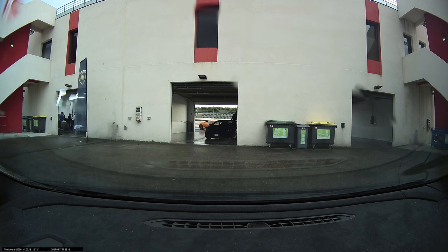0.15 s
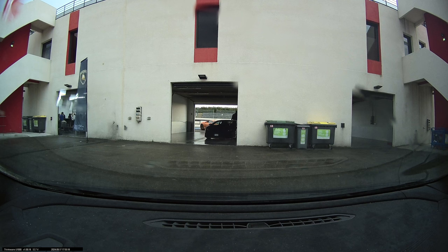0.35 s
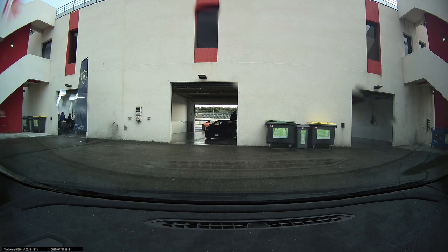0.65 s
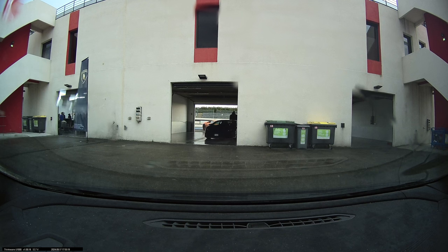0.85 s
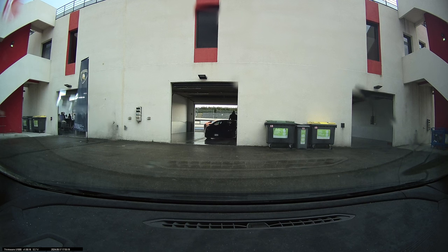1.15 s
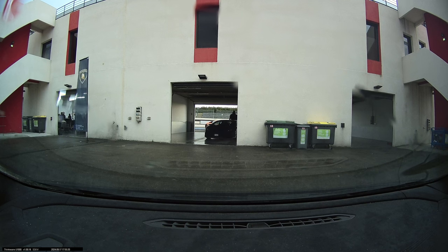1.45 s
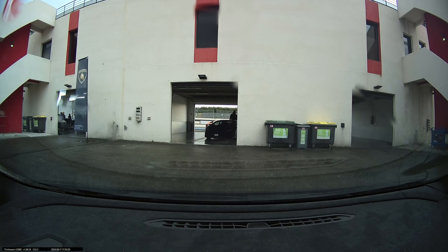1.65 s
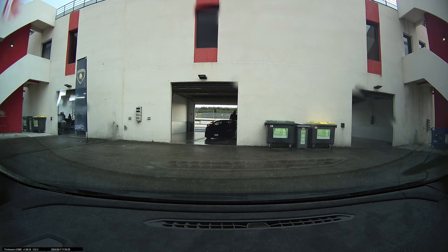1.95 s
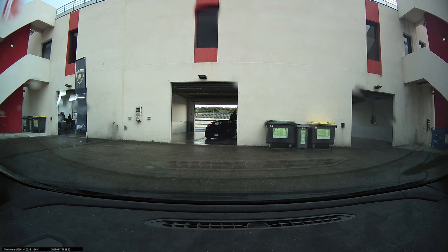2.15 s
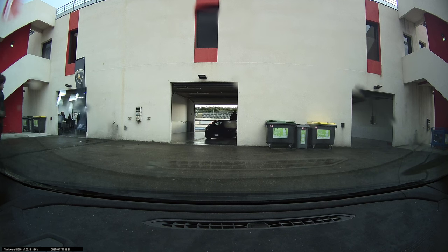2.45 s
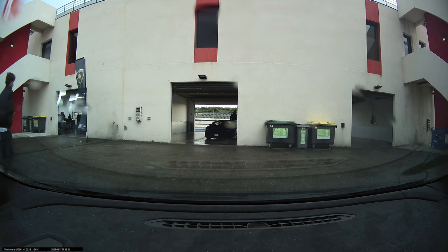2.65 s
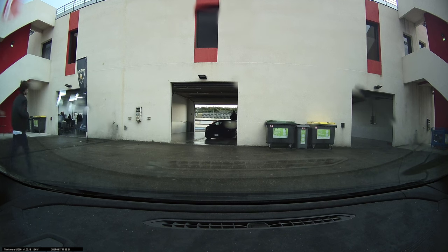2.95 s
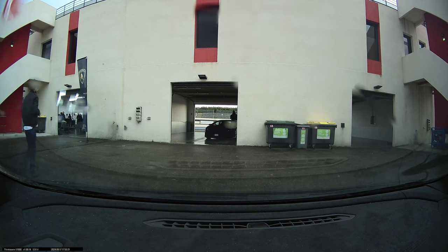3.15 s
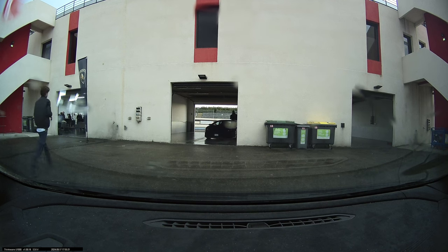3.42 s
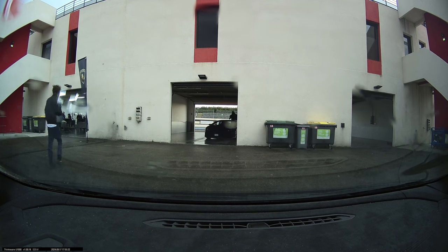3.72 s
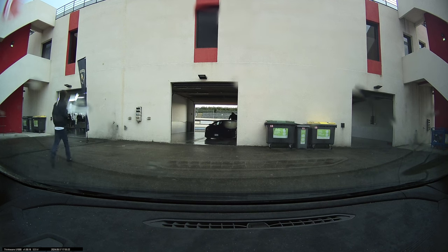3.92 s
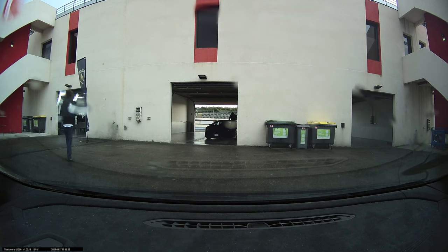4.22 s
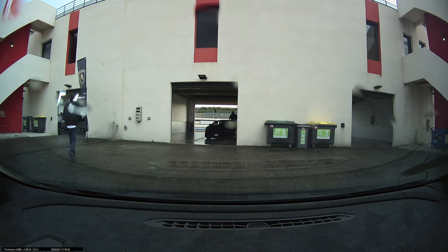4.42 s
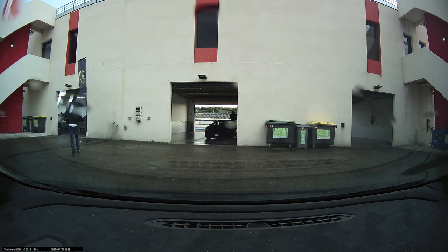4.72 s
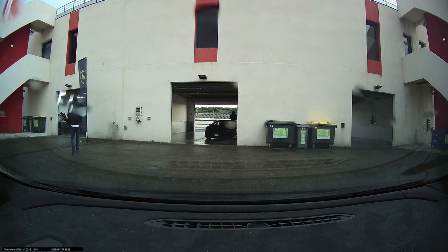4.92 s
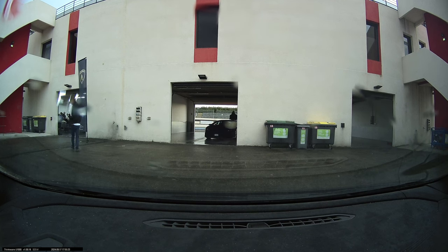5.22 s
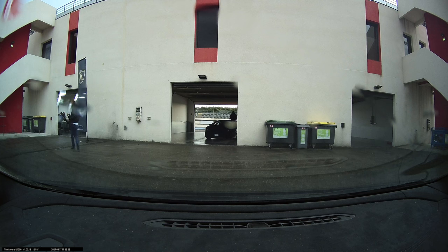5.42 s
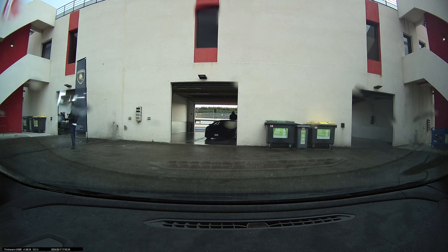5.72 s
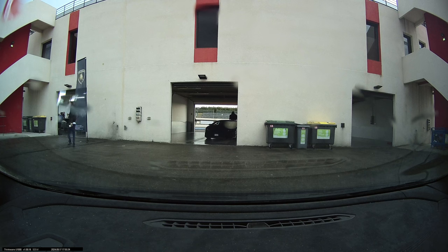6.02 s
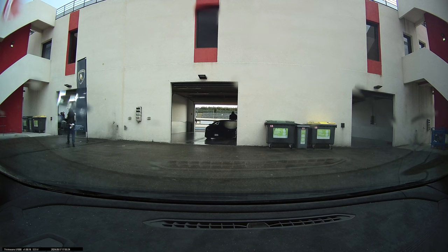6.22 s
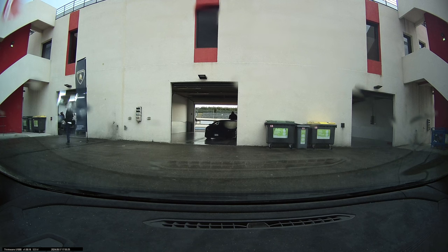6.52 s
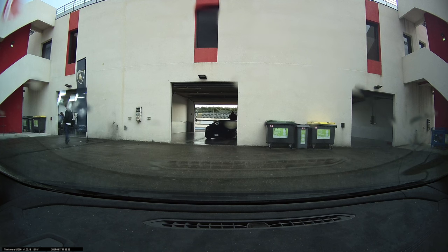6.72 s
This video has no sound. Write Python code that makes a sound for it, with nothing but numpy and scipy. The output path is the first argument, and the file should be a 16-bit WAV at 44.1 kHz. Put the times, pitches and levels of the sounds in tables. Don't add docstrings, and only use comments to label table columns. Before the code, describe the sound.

Close inside a parked car, a dash microphone picks up muffled low hiss, a faint wavering distant hum, and irregular raindrops, dull on the roof and sharp on the glass. From the start to about 0.9 seconds the car is handled: soft rocking, low bumps near 0.65 and rustling trim. At about 0.95 a thin high hinge squeal slides down and up, gone in a tenth of a second. Air pressure swells and at 1.2 the door slams, a massive distorted thump with a metallic latch crack and seal rattle. The cabin booms deeply and settles with bumps until about 2.1. Quiet rain ticks continue, with a sharper tap at 2.9 and the hum faintly back after 3. Lock motors thud at 3.64, then click at 3.85 and 4.03. Drops continue, one cracking at 5.4. A softer second locking thuds at 5.93, clicking at 6.05 and 6.23. Only sparse rain and hiss remain until 7.

```python
import sys
import numpy as np
from scipy import signal
from scipy.fft import rfft, irfft, next_fast_len
from scipy.io import wavfile
from scipy.ndimage import uniform_filter1d, map_coordinates

SR = 44100
rng = np.random.default_rng(int(sys.argv[2]) if len(sys.argv) > 2 else 0)


def generate_wav(sig):
    pcm = np.round(np.clip(np.atleast_2d(sig).T, -1, 1) * 32767).astype(np.int16)
    wavfile.write(sys.argv[1], SR, pcm)


def invert_db(x):
    u = np.asarray(x, float) / 20
    return 10 ** u


N = 302885

# frequency in Hz, level in dB per Hz.
FLOOR_COLOUR = [(8.8, -26.5), (15, 1.5), (43, 3), (108, -4), (206, -3.5), (260, -9), (379, -11.5),
                (934, -15.5), (1110, -23), (1440, -23.5), (2370, -31), (3560, -31), (5350, -37),
                (14500, -39), (15200, -35)]
# time in seconds, pitch in Hz, level in dB.
WHINE = [(0, 8630, -91.5), (1.5, 8600, -93), (2.5, 8400, -92.5), (3.6, 8390, -93.5), (3.9, 8360, -108),
         (7, 8348, -110)]
# multiple of its pitch, level in dB.
WHINE_TONES = [(1, -1.5), (1.29, -6), (1.62, -4.5)]
# time in seconds, pitch in Hz, level in dB.
HUM = [
    [(0, 208.4, -59.5), (.15, 209.2, -61.5), (.37, 210.1, -53.5), (.58, 207.4, -63), (.8, 210.3, -60),
     (1.0, 212.2, -67.5), (1.1, 212, -73)],
    [(3.05, 228.8, -73), (3.25, 231.8, -68.5), (3.45, 230.5, -71.5), (3.62, 237.2, -73.5)],
]

# start in seconds, hold in seconds, then rocking, panel and rustle in dB.
JOLTS = [(0, 0.53, -53.5, -63, -62), (0.631, 0.036, -50, -48, -52.5), (0.7, 0.061, -53, -55.5, -63),
         (0.821, 0.096, -47, -61.5, -65), (0.944, 0.085, -50, -71, -62), (1.413, 0.011, -50, -63, -53),
         (1.486, 0.016, -48, -49.5, -53.5), (1.521, 0.092, -52, -47.5, -55.5), (1.599, 0.21, -67, -58, -50),
         (1.804, 0.029, -44, -54.5, -54.5), (1.925, 0.0178, -52, -59.5, -61.5),
         (2.005, 0.121, -63, -71, -71.5), (3.948, 0.087, -64, -46, -57.5),
         (4.034, 0.03, -59.5, -40.5, -54.5), (4.085, 0.017, -71, -45, -77)]
JOLT_RISE_S, ROCK_T60_S, PANEL_T60_S, RUSTLE_T60_S = 0.017, 0.26, 0.22, 0.17
# start in seconds, level in dB, rise in seconds, t60 in seconds.
SWAY = (1.2, -45.5, 0.9, 0.33)
# start in seconds, level in dB, rise in
# seconds, t60 in seconds.
DRUMMING = [(.625, -52, 0.0343, 0.24), (0.689, -51, 0.0077, 0.12), (1.139, -36.5, 0.032, 0.33),
            (1.254, -29.5, 0.0027, 0.19), (1.419, -37.5, 0.0034, 0.16), (1.532, -47, 0.0052, 0.13),
            (1.585, -57, 0.004, 0.1), (1.672, -47.5, 0.012, 0.14), (1.814, -56, 0.0071, 0.12),
            (3.644, -41, 0.0066, 0.28), (3.958, -48.5, 0.004, 0.213), (4.001, -49, 0.0153, 0.15),
            (4.061, -35.5, 0.0026, 0.142), (5.931, -57.5, 0.0038, 0.38), (6.178, -62.5, 0.0034, 0.087)]
# frequency in Hz, level in dB per Hz.
SKIN_COLOUR = [(50, -36.5), (90, -1.5), (160, 0), (260, 1), (400, -6.5), (600, -9), (900, -10.5),
               (1600, -66)]
PANEL_COLOUR = [(32, -43), (55, -3.5), (81, 3.5), (145, -1), (215, -1), (400, -17), (520, -35), (880, -120)]
TRIM_COLOUR = [(250, -48), (420, 2), (560, -5), (800, -1), (1100, -4.5), (1350, -6.5), (1600, -7),
               (2100, -13), (2700, -21.5), (3400, -19), (4200, -26.5), (9000, -42)]
# resonance in Hz, width in Hz, level in dB.
CREAK = [(266, 40, 1), (563, 60, -2.5), (797, 38, 1.5), (1383, 42, 1.5), (2113, 85, -7), (3470, 500, -8)]
# time in seconds, swing rate in Hz, peak level in dB.
ROCKING = [(.627, 37, -41), (.675, 36.5, -33.5), (.705, 30, -31.5), (.74, 32.5, -31), (.77, 30, -39.5),
           (.85, 28.5, -42), (.88, 33, -43), (.93, 33, -41), (.96, 33, -58)]
# start in seconds, pitch in Hz, level in dB, t60 in seconds.
KNOCKS = [(.645, 318.5, -44.5, 0.132), (1.2455, 880, -28.5, 0.015), (1.2565, 600, -24, 0.0282),
          (1.257, 1580, -31.5, 0.023), (1.259, 3500, -35, .03), (1.246, 3280, -39, .015),
          (1.284, 770, -42, 0.062), (1.3, 254, -38.5, 0.2), (1.362, 226.8, -41.5, 0.116),
          (1.331, 130, -30, 0.24), (1.34, 193, -35.5, 0.193), (1.42, 258, -42, 0.155),
          (1.532, 143, -41.5, 0.12), (1.536, 266, -41.5, 0.11), (1.585, 45, -27, 0.085),
          (1.812, 126, -40.5, 0.2), (3.64, 285.6, -30.5, 0.14), (3.961, 149, -45, 0.44),
          (4.06, 135.8, -40, 0.23), (1.535, 194, -39.5, 0.15), (1.83, 75.2, -41, 0.207),
          (3.645, 377, -30.5, 0.11), (3.641, 227.8, -38, 0.28)]

# start in seconds, peak level in dB, splash fade in dB per 10 ms.
ROOF_DROPS = [(0.355, -39, 3.5), (1.379, -43, 14), (1.393, -50, 3), (1.42, -44, 17), (1.436, -39.5, 11.5),
              (1.483, -42.5, 11), (1.534, -43.5, 6), (1.669, -40.5, 2), (2.043, -42.5, 18),
              (2.323, -46, 18), (2.845, -53, 3.5), (2.982, -51, 2), (3.073, -41.5, 12.5),
              (3.096, -54.5, 2.5), (3.256, -47, 5.5), (3.357, -44.5, 13), (3.959, -60, 11.5),
              (4.069, -45, 6), (4.26, -48.5, 9), (4.424, -45, 7.5), (4.588, -54, 2), (5.13, -43, 15.5),
              (5.302, -51, 4.5), (5.365, -50.5, 2), (5.549, -51, 2.5), (5.785, -55, 10.5), (5.85, -47, 18),
              (6.132, -50.5, 3.5), (6.38, -50, 7), (4.505, -47.5, 12.5)]
GLASS_DROPS = [(0.455, -55, 6.7), (.627, -45, 14), (.741, -40.5, 21.6), (0.811, -48, 9.5),
               (0.873, -49, 4.1), (1.079, -51.5, 7.1), (1.589, -45, 6), (2.016, -42.5, 6.5),
               (2.156, -50.5, 4.2), (2.181, -50, 7), (2.544, -48, 16), (0.4672, -47, 11), (3.052, -52, 5.4),
               (3.304, -47, 28), (3.326, -43.5, 24.6), (3.743, -53, 2.3), (3.777, -51.5, 3.7),
               (3.907, -46, 3.5), (3.989, -43, 15), (4.121, -47.5, 20), (4.15, -38.5, 23),
               (4.795, -46.5, 10), (4.899, -47, 8.14), (5.154, -47, 12), (5.183, -47, 15),
               (0.611, -43.5, 7.4), (5.623, -46, 6.6), (5.64, -43, 23), (5.692, -51, 13),
               (6.842, -49.5, 6.7)]
ROOF_SHARP_DB, GLASS_SHARP_DB = -16, -8
STRAY_PER_S, STRAY_DB, STRAY_FADE_DB = 4.5, -66, 9
# frequency in Hz, level in dB per Hz.
CABIN_COLOUR = [(180, -42.5), (300, -11.5), (410, 0), (750, 0.5), (1100, -3), (1400, -4), (1850, -8),
                (2600, -14), (3400, -21), (4000, -21.5), (4600, -36), (9000, -56.5), (15000, -72.5)]
# start in seconds, level in dB, pitch in Hz, t60 in seconds.
SNAPS = [(0.0173, -52.5, 3290, 0.0056), (.155, -56, 3600, 0.0079), (0.177, -59, 3500, .008),
         (.2438, -56, 2400, .008), (.3057, -62.5, 3000, 0.0076), (.3361, -57, 3600, 0.0078),
         (.5935, -56, 3187, .006), (0.6541, -49, 2780, 0.011), (1.5114, -57, 1800, .008),
         (1.6171, -57, 2000, 0.007), (1.6366, -55, 1500, 0.0073), (1.7533, -56, 1500, 0.0073),
         (1.7882, -48, 1390, 0.0094), (1.839, -48, 1390, 0.0092), (2.8672, -34.5, 947, 0.0064),
         (3.304, -53, 1490, 0.0044), (4.15, -51, 1290, 0.0069), (5.156, -48, 1490, 0.0059),
         (5.442, -32, 1090, 0.0045), (5.4173, -56, 1900, .006), (6.095, -60, 1490, .006),
         (6.117, -60, 3600, .006), (5.848, -53, 1198, 0.0092)]
SNAP_SPLASH_DB, SNAP_SPLASH_T60_S = -21, 0.044
# multiple of its pitch, level in dB.
SNAP_OVERTONES = [(2.3, -8), (4.2, -10), (6.2, -15)]
SNAP_EDGE_T60_S = 0.0035
# start in seconds, level in dB, pitch in Hz.
TICKS = [(0.5566, -65, 1670), (0.9103, -63, 3740), (0.9302, -56, 2540), (1.8855, -57.5, 1500),
         (1.9315, -65, 2000), (1.9395, -64, 2060), (2.08, -66, 1580), (2.255, -57, 1520),
         (2.3037, -57, 1730), (2.372, -64, 1590), (2.4124, -63, 1850), (2.4603, -58, 1680),
         (2.5126, -59, 1510), (2.5616, -64, 1620), (2.6094, -73.5, 1570), (2.648, -61.5, 1520),
         (2.7197, -66, 1870), (2.8075, -64, 3370), (2.8195, -62, 1980), (2.9105, -58, 1510),
         (2.9414, -69, 1750), (2.9584, -59.5, 2130), (3.011, -58, 1780), (3.1522, -63, 1710),
         (3.1694, -73, 1550), (3.2251, -68, 1510), (3.263, -59, 1670), (3.4236, -65, 1790),
         (3.48, -62, 1660), (3.6012, -59, 1590), (4.2223, -67, 1500), (4.348, -72, 1650),
         (4.366, -59, 1690), (4.4079, -60, 1730), (4.6024, -56, 1890), (4.6287, -66, 2120),
         (4.675, -57.5, 1660), (4.8268, -59, 1670), (4.8806, -60, 1750), (5.236, -60.5, 3640),
         (5.2709, -68, 1560), (5.476, -62, 1770), (5.4983, -65, 1620), (5.7683, -66.5, 2110),
         (5.8047, -63, 1580), (5.9908, -63, 1500), (6.4423, -63, 1610), (6.4961, -72, 1680),
         (6.5635, -63, 1580), (6.622, -62.5, 1690), (6.7865, -71, 3720)]
TICK_T60_S, TICK_GAIN_DB, PANE_TOP_HZ = 0.0084, 1.5, 7060

# time in seconds, pitch in Hz, level in dB.
SQUEALS = [
    [(.872, 14200, -87), (.895, 12000, -80), (.908, 9300, -80), (.912, 8059, -70), (.943, 7540, -63.5),
     (.958, 7500, -69), (.965, 6620, -61), (.974, 5880, -70), (.98, 5800, -95.5)],
    [(.962, 7705, -86), (.97, 7670, -56.5), (.989, 8010, -63.5), (1.0, 8970, -63), (1.012, 9900, -67),
     (1.023, 10940, -67), (1.036, 11200, -73.5), (1.048, 11400, -89)],
]
# frequency in Hz, level in dB per Hz.
HINGE_COLOUR = [(1470, -43), (2500, -6), (3500, 1), (4200, -7.5), (5100, -3.5), (7000, -8), (8800, -4),
                (10700, -3.5), (12000, -7), (15500, -12.5)]
# time in seconds, pitch in Hz, level in dB.
JUDDER = [(.935, 3540, -86.5), (.952, 3560, -62), (.965, 3500, -60), (.978, 3500, -61.5), (1.0, 3300, -80)]
# multiple of its pitch, level in dB.
JUDDER_TONES = [(1, -3), (3, -4)]
# start in seconds, length in seconds, first pitch in Hz, last pitch in Hz, level in dB.
WHISTLES = [(.915, .045, 15700, 15400, -76), (.922, 0.05, 5000, 5100, -71), (.924, 0.031, 2600, 2550, -70),
            (.95, .018, 14200, 13800, -76), (.962, .022, 13300, 13100, -74), (.98, .025, 7800, 7900, -68),
            (.98, 0.049, 11000, 11300, -69), (1.016, .026, 12900, 13500, -64),
            (1.025, .025, 12000, 12300, -71), (.93, .03, 10300, 10400, -78)]
WHISTLE_JITTER = 0.022

# start in seconds, power of the rise, size as a share of full scale.
SWING = (1.0, 5, .98)
# time in seconds, pressure as a share of full scale.
SEAL = [(1.1992, -.7), (1.2004, -.02), (1.2012, .02), (1.2026, .62), (1.21, 1.45), (1.2612, .5),
        (1.2653, -.85), (1.2805, -.47), (1.2832, 0)]
# peak time in seconds, pressure as a share of full scale, rise in seconds, fall in seconds.
BOUNCES = [(1.2468, -.48, .002, .0027), (1.258, -.24, .002, .015), (1.303, -.22, .029, .009),
           (1.316, .1, .004, .06)]
REBOUND_S = 1.2856
# pitch in Hz, level in dB, t60 in seconds.
BOOM = [(34.5, -28, 1.1), (40.3, -16, .62), (49.7, -19.5, .28), (88.5, -29.5, .48), (108.4, -27, .27),
        (158, -36, .15), (204.5, -30, .17)]
# start in seconds, level in dB, rise in seconds, t60 in seconds.
RATTLE = [
    (1.15, -43, .003, .5),
    (1.172, -34, .028, .2),
    (1.25, -37, .012, .1),
]
# start in seconds, level in dB, rise in seconds, t60 in seconds.
CRACK = (1.1988, -28, .001, .04)
# pitch in Hz, level in dB, t60 in seconds.
STRIKER = [(822, -21.5, 0.02077), (973.6, -23, 0.0199), (1669, -21, 0.027), (2368, -8.5, 0.012),
           (3000, -20, 0.01387), (5085, -29, .02), (5880, -33.5, .02)]
# frequency in Hz, level in dB per Hz.
RUBBER_COLOUR = [(200, -27.5), (350, 0.5), (600, 0), (1000, -5.5), (1700, -7.5), (2500, -19), (3400, -12.5),
                 (4000, -26), (4500, -39), (9000, -62.5)]
STEEL_COLOUR = [(300, -30), (700, -4), (1000, -3), (1800, 0), (2500, 0), (3400, -5), (4200, -16),
                (5500, -13), (7000, -23), (9000, -31), (15000, -44)]

# start in seconds, level in dB, rise in seconds, t60 in seconds, hollow part in dB.
THUDS = [(3.621, -44, 0.02, 0.041, -18), (3.641, -33, 0.0034, 0.096, 2.5),
         (3.656, -41.5, 0.005, 0.085, -6.5), (3.878, -50.5, 0.0023, 0.132, 0),
         (5.927, -45.5, 0.00303, 0.097, 1), (6.178, -50, 0.0043, 0.11, 0.5)]
# resonance in Hz, width in Hz, level in dB.
HOUSING = [(561, 287, -2), (860, 350, 2), (1390, 510, 0.5), (2260, 1100, -3.5), (3285, 580, -2),
           (4590, 1700, -13.5), (6200, 1300, -14), (9600, 4300, -23)]
HOLLOW = [(270, 48, -0.5), (398, 160, -5.5)]
# pitch in Hz, level in dB, t60 in seconds.
PAWL = [(585, -9, 0.065), (1164, 3, 0.018), (1277, 5, 0.035), (1660, -18, 0.057), (2350, -12, 0.052),
        (2700, -15, 0.043), (3500, -14, 0.046), (3700, -6.5, 0.044)]
LEVER = [(493, -12, 0.096), (825, 0, 0.054), (974, 8.5, 0.022), (1392, -6.5, 0.067), (1940, -11, 0.0296),
         (2674, -6, 0.049), (3500, -17, 0.035)]
# start in seconds, level in dB.
PAWL_HITS = [
    (3.845, -41.5),
    (6.047, -41),
    (6.078, -66),
]
LEVER_HITS = [
    (3.819, -57),
    (4.031, -42),
    (6.2346, -42),
]

# start in seconds, length in seconds, lost above this many Hz.
TREBLE_GAPS = [(1.13, .06, 5200), (1.27, .05, 9000), (1.32, .05, 13000), (3.84, .022, 12800),
               (4.012, .042, 12800), (5.43, .025, 12800), (5.92, .02, 12800), (6.04, .025, 12800),
               (6.225, .025, 12800)]
TOP_HZ = 15780


def unit(x):
    return x / np.sqrt(np.mean(x ** 2) + 1e-20)


def curves(rows, off=-110):
    s, *columns = np.transpose(rows)
    return [np.interp(np.arange(N) / SR, s, column, off, off) for column in columns]


def wobble(rate):
    return map_coordinates(rng.standard_normal(int(N * rate / SR) + 4), [np.arange(N) * rate / SR])


def phase(hz):
    return 2 * np.pi * np.cumsum(hz) / SR


def filtered(x, response):
    m = next_fast_len(N + 8192)
    return irfft(rfft(x, m) * response(np.fft.rfftfreq(m, 1 / SR)), m)[:N]


def noise(colour):
    points_hz, db = np.transpose(colour)

    def response(hz):
        return invert_db(np.interp(np.log(hz + 1), np.log(points_hz + 1), db))

    return unit(filtered(rng.standard_normal(N), response))


def resonances(modes):
    def response(f):
        total = 0
        for k, (centre, width, db) in enumerate(modes):
            damping = 1j * f * width
            total = total + (-1) ** k * invert_db(db) * damping / (centre * centre - f * f + damping)
        return total ** 2

    return response


def resonant_noise(modes):
    return unit(filtered(rng.standard_normal(N), resonances(modes)))


def placed(s, shape, lasts=1.5):
    out, first = np.zeros(N), int(np.ceil(s * SR))
    since = np.arange(first, min(N, first + round(lasts * SR))) / SR - s
    out[first:first + len(since)] = shape(since)
    return out


def burst(s, db, rise, t60, hold=0):
    def shape(t):
        return invert_db(db - 60 * np.clip(t - rise - hold, 0, None) / t60) * np.clip(t / rise, 0, 1)

    return placed(s, shape)


def ring(s, modes, onset=0.00043):
    def shape(t):
        total = 0
        for hz, db, t60 in modes:
            rise = 1 - np.exp(-t / (onset if hz < 1800 else 0.004))
            total = total + rise * invert_db(db - 60 * t / t60) * np.sin(2 * np.pi * hz * t)
        return total

    return placed(s, shape)


def cabin_echo(x, t60, wet_db):
    t = np.arange(SR // 5) / SR
    tail = rng.standard_normal(len(t)) * invert_db(-60 * t / t60)
    return x + invert_db(wet_db) * signal.fftconvolve(x, tail / np.linalg.norm(tail))[:N]


def floor():
    hz, db = curves(WHINE)
    whine = 0
    for ratio, level in WHINE_TONES:
        loudness = invert_db(db + level + 2.7 * wobble(3))
        whine = whine + loudness * np.sin(ratio * phase(hz * (1 + 0.024 * wobble(300))))
    bed = noise(FLOOR_COLOUR)
    street = filtered(bed, lambda f: 1 / (1 + (f / 4500) ** 4))
    hiss = invert_db(0.4 * wobble(6) + (db + 94) / 12) * (bed - street)
    return invert_db(-64) * (invert_db(1.2 * wobble(4.3)) * street + hiss) + whine


def hum():
    out = 0
    for rows in HUM:
        hz, db = curves(rows)
        turn = phase(hz * (1 + 0.021 * wobble(30)))
        out = out + invert_db(db + 1.0 + 2.4 * wobble(22.01)) * (np.sin(turn) + invert_db(-17.0) * np.sin(2 * turn))
    return out


def jolted(column, t60):
    return np.max([burst(row[0], row[column], JOLT_RISE_S, t60, hold=row[1]) for row in JOLTS], axis=0)


def body():
    rock = jolted(2, ROCK_T60_S) + burst(*SWAY)
    panel, rustle = jolted(3, PANEL_T60_S), jolted(4, RUSTLE_T60_S)
    springs = resonant_noise([(31.71, 11, 4.0), (52.93, 19.93, -8.0)])
    scuffs = unit(invert_db(3.0 * wobble(30.058) + 1.6 * wobble(250)) * noise(TRIM_COLOUR))
    creaks = invert_db(-7.0 + 3.25 * wobble(22.95)) * resonant_noise(CREAK)
    drumming = sum(burst(*row) for row in DRUMMING) * noise(SKIN_COLOUR)
    thumps = panel * invert_db(-3.5) * noise(PANEL_COLOUR)
    return rock * springs + thumps + rustle * invert_db(-5) * (scuffs + creaks) + drumming


def falling():
    rows = [(*drop, ROOF_SHARP_DB) for drop in ROOF_DROPS] + [(*drop, GLASS_SHARP_DB) for drop in GLASS_DROPS]
    for s, size, side in rng.random((round(STRAY_PER_S * N / SR), 3)):
        sharp_db = ROOF_SHARP_DB if side < 0.5 else GLASS_SHARP_DB
        rows.append((s * N / SR, STRAY_DB + 8 * (size - 0.5), STRAY_FADE_DB, sharp_db))
    return np.array(rows) + np.outer(rng.standard_normal(len(rows)), [0, 1.02, 0.0056, 1.7])


def rain():
    taps, dull, sharp = np.zeros((3, N + SR))
    t = np.arange(SR // 8) / SR
    soft = 1 - np.exp(-t / 0.0006)
    for s, db, fade_db, sharp_db in falling():
        low, high = rng.standard_normal(2)
        roof = invert_db(db - 2.0 - 60 * t / 0.005) * np.sin(2 * np.pi * 1200 * np.exp(0.165 * low) * t)
        pane_loudness = invert_db(db + sharp_db + 8.5 - 60 * t / 0.00242)
        pane = pane_loudness * np.sin(2 * np.pi * 3700 * np.exp(0.15 * high) * t)
        span = slice(round(s * SR), round(s * SR) + len(t))
        taps[span] += soft * (roof + pane)
        dull[span] += soft * invert_db(db - 12.5 - fade_db * t / 0.0091)
        sharp[span] += soft * invert_db(db + sharp_db - 9.5 - 1.78 * fade_db * t / 0.0054)
    landing = rng.random(N) < 60 / SR * invert_db(2.5 * wobble(8))
    size = np.clip(rng.exponential(size=N), 0, 1.4) * landing
    patter = signal.fftconvolve(size, soft * invert_db(-70.0 - 60 * t / 0.04044))[:N]
    glass = noise([(1500, -29.0), (2500, -9.0), (3500, 7.5), (4500, -5.5), (7000, -8.5), (12000, -34.5)])
    splash = (dull[:N] + patter) * noise(CABIN_COLOUR) + (sharp[:N] + invert_db(-11.0) * patter) * glass
    return cabin_echo(taps[:N] + splash, t60=0.028, wet_db=-13.0)


def snap(s, db, hz, t60):
    def shape(t):
        tone = invert_db(-60 * t / t60) * np.cos(2 * np.pi * hz * t)
        for ratio, level in SNAP_OVERTONES:
            if ratio * hz < 8000:
                tone = tone + invert_db(level - 60 * t / SNAP_EDGE_T60_S) * np.cos(2 * np.pi * ratio * hz * t)
        return -(1 - np.exp(-t / 0.0001)) * invert_db(db) * tone

    return placed(s, shape, lasts=0.05)


def snaps():
    rows = SNAPS + [(s, db + TICK_GAIN_DB, hz, TICK_T60_S) for s, db, hz in TICKS]
    pane = filtered(sum(snap(*row) for row in rows), lambda f: 1 / (1 + (f / PANE_TOP_HZ) ** 4))
    splash = sum(burst(s, db + SNAP_SPLASH_DB, 0.0005, SNAP_SPLASH_T60_S) for s, db, *_ in SNAPS)
    specks = sum(placed(s, lambda t: invert_db(db - 6.5 - 60 * t / 0.054), lasts=0.05) for s, db, _ in TICKS)
    spray = invert_db(-7) * noise([(1500, -24), (2500, -4), (3500, 4.5), (4500, -8), (6500, -12.5), (10000, -38)])
    return pane + (splash + specks) * noise(CABIN_COLOUR) + (specks + invert_db(-6.5) * splash) * spray


def rocking():
    hz, db = curves(ROCKING, off=0)
    return (hz > 0) * invert_db(db) * np.sin(phase(hz))


def knocks():
    return sum(ring(s, [(hz, db, t60)]) for s, hz, db, t60 in KNOCKS)


def hinge():
    tracks = [curves(rows) for rows in SQUEALS]
    squeal = sum(invert_db(db + 4) * np.sin(phase(hz * (1 + 0.018 * wobble(900)))) for hz, db in tracks)
    loudest = np.max([invert_db(db) for _, db in tracks], axis=0)
    hz, db = curves(JUDDER)
    judder = sum(invert_db(db + level) * np.sin(k * phase(hz)) for k, level in JUDDER_TONES)
    hiss = noise(HINGE_COLOUR)
    fuzz = unit(filtered(hiss ** 2, lambda f: (f > 100) / (1 + (f / 900) ** 2)))
    tones = squeal * (1 + invert_db(-6.5) * fuzz) + judder * (1 + invert_db(-3) * fuzz)
    grain = invert_db(1.5 * wobble(120))
    return cabin_echo(grain * tones + invert_db(-5.0) * loudest * hiss, t60=0.04, wet_db=-14.0)


def whistles():
    stray = np.cumsum(WHISTLE_JITTER * wobble(900)) / SR
    out = 0
    for s, length, first_hz, last_hz, db in WHISTLES:
        def shape(t):
            swell = np.sin(np.pi * np.clip(t / length, 0, 1))
            glide = first_hz * t + (last_hz - first_hz) * t * t / (2 * length)
            jitter = first_hz * stray[int(np.ceil(s * SR)):][:len(t)]
            return invert_db(db) * swell * np.sin(2 * np.pi * (glide + jitter))

        out = out + placed(s, shape)
    return invert_db(2.5 * wobble(150)) * out


def door():
    t = np.arange(N) / SR
    start, power, size = SWING
    contact = SEAL[0][0]
    swing = -size * np.clip((t - start) / (contact - start), 0, 1) ** power * (t < contact)
    bounces = sum(np.interp(t, [s - rise, s, s + fall], [0, push, 0]) for s, push, rise, fall in BOUNCES)
    air = uniform_filter1d(swing + curves(SEAL, off=0)[0] + bounces, size=30)
    rattle = sum(burst(*row) for row in RATTLE) * invert_db(3.7 * wobble(150)) * noise(RUBBER_COLOUR)
    latch = burst(*CRACK) * noise(STEEL_COLOUR) + ring(CRACK[0], STRIKER)
    return air + ring(REBOUND_S, BOOM) + rattle + latch


def locks():
    housing, hollow = resonant_noise(HOUSING), resonant_noise(HOLLOW)
    thuds = sum(burst(*row) * (housing + invert_db(hollow_db) * hollow) for *row, hollow_db in THUDS)
    pawl = sum(invert_db(db) * ring(s, PAWL, onset=0.0012) for s, db in PAWL_HITS)
    lever = sum(invert_db(db) * ring(s, LEVER, onset=0.0005) for s, db in LEVER_HITS)
    clicks = invert_db(2.5 * wobble(200)) * (pawl + lever)
    hits = PAWL_HITS + LEVER_HITS
    scrape = sum(burst(s, db - 10.5, rise=0.0029, t60=0.12) for s, db in hits) * noise(CABIN_COLOUR)
    slide = sum(burst(s - 0.013, db - 33.0, rise=0.004, t60=0.059) for s, db in PAWL_HITS)
    slide = slide * noise([(2500, -29.5), (3600, -7), (5000, 2.0), (6500, -21)])
    return cabin_echo(thuds + clicks + scrape + slide, t60=0.1, wet_db=-11.5)


def treble_gapped(x):
    hz, t, z = signal.stft(x, SR, nperseg=256)
    lost = np.max([np.outer(hz > top, (t > s) & (t < s + length)) for s, length, top in TREBLE_GAPS], axis=0)
    return x - signal.istft(z * lost, SR, nperseg=256)[1][:N]


def scene():
    background = floor() + hum() + rain() + snaps()
    handling = body() + rocking() + knocks()
    closing = hinge() + whistles() + door()
    return (background + handling + closing + locks())[None]


def low_pass(x):
    return signal.sosfilt(signal.butter(12, 15840, fs=SR, output="sos"), x)


def record(dry):
    clipped = np.clip(dry[0], -0.486, 0.486)
    mix = treble_gapped(filtered(clipped, lambda hz: hz < TOP_HZ))[None]
    return low_pass(mix)


dry = scene()
out = record(dry)
generate_wav(out)
```